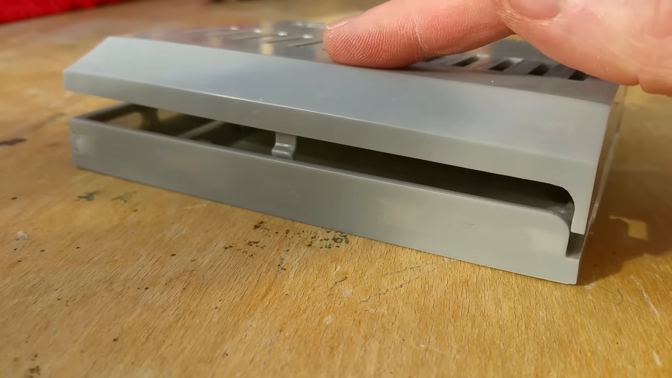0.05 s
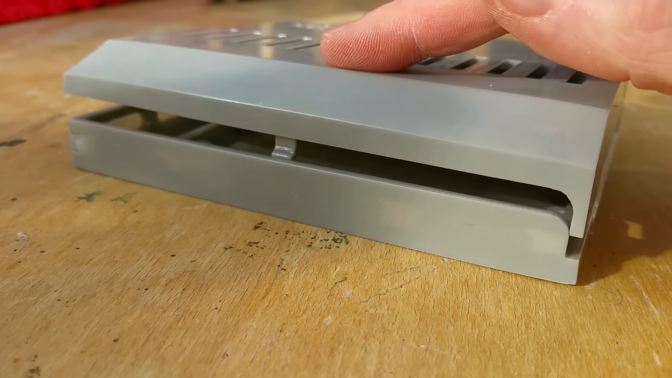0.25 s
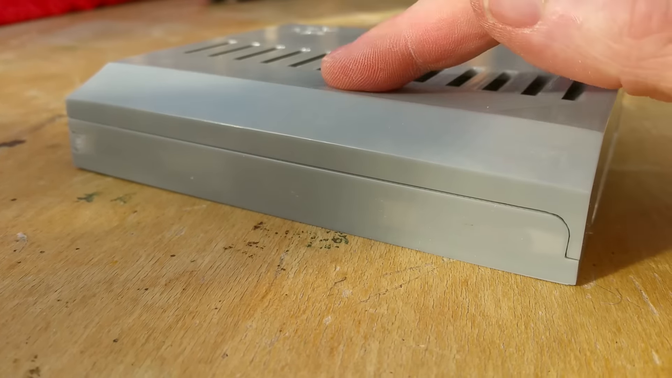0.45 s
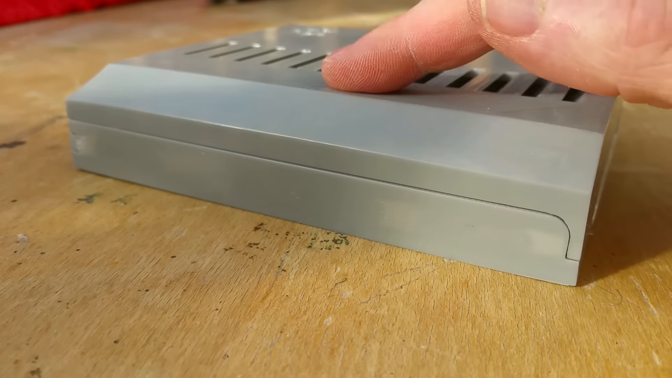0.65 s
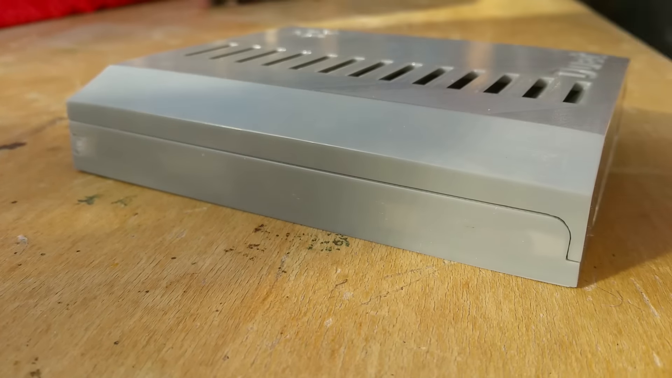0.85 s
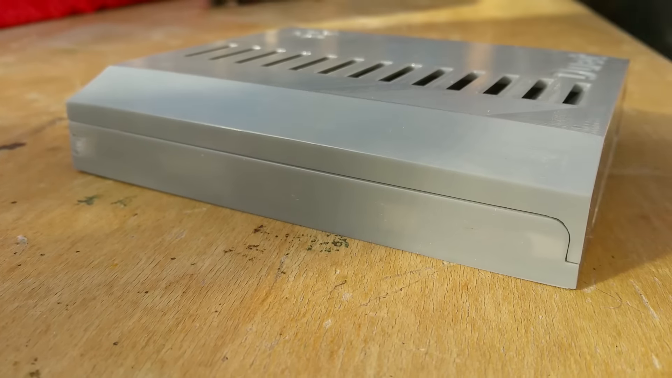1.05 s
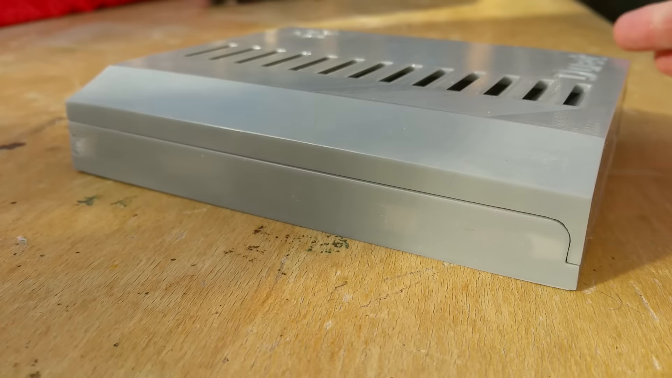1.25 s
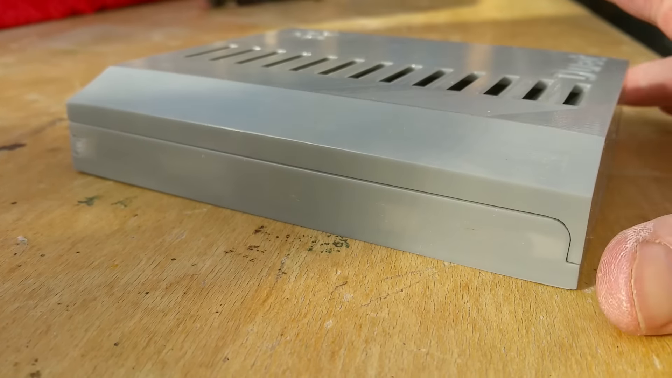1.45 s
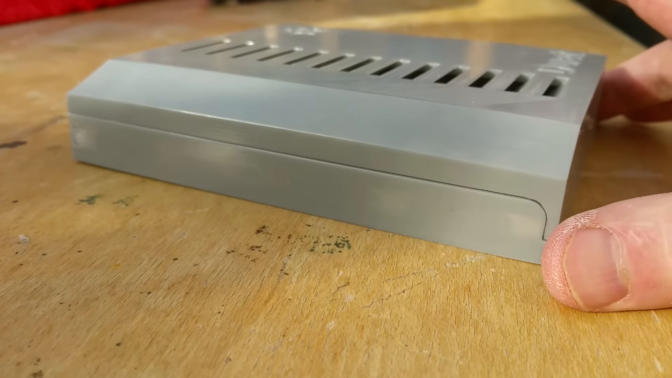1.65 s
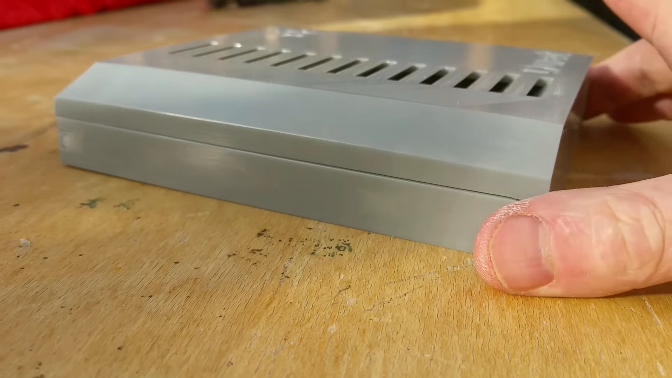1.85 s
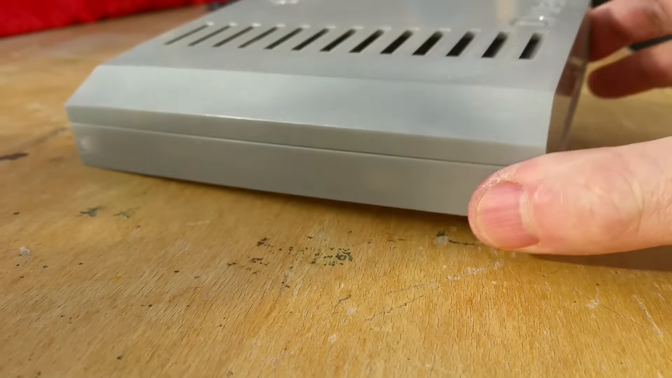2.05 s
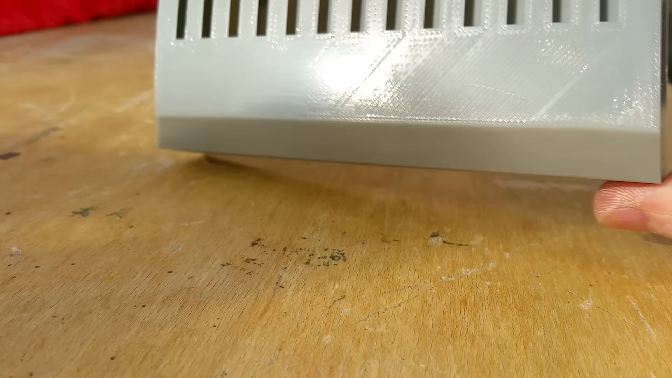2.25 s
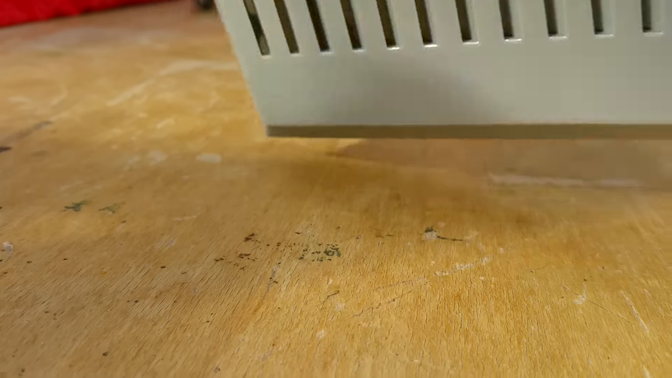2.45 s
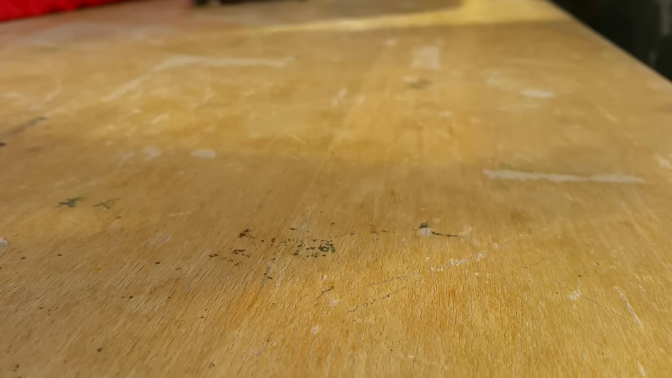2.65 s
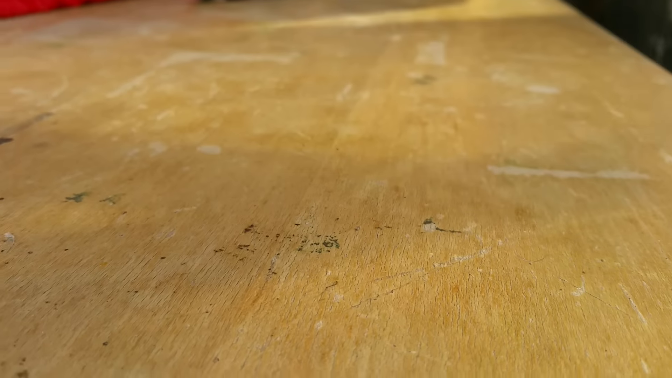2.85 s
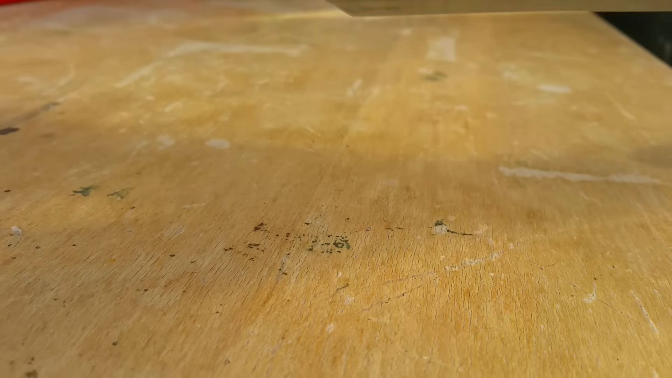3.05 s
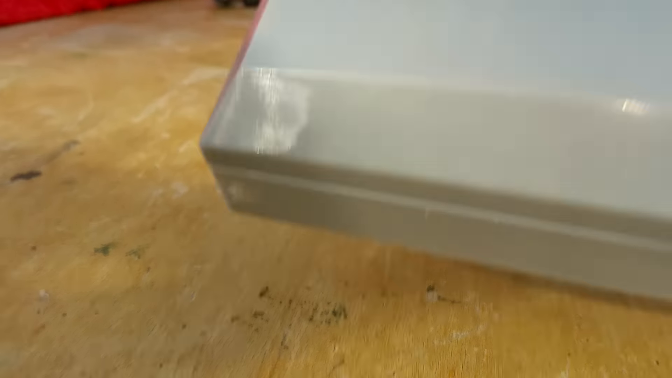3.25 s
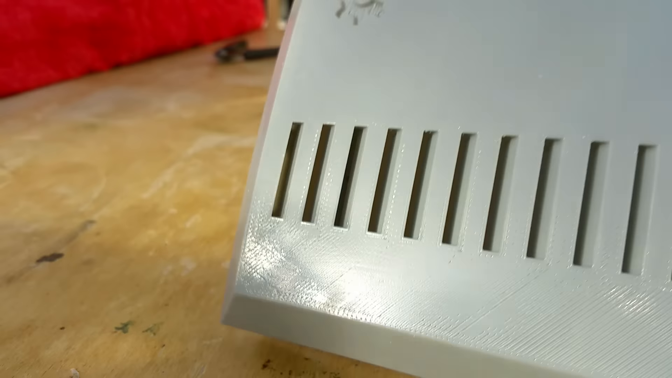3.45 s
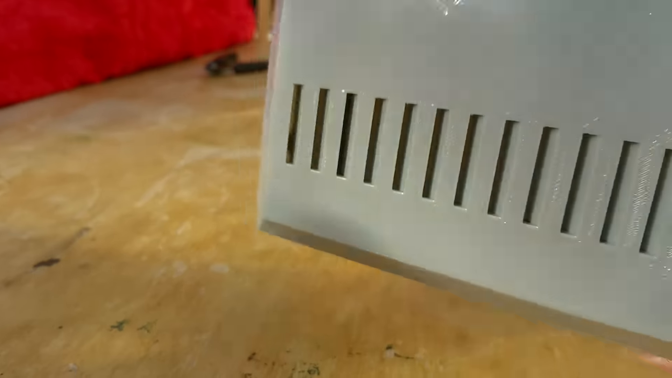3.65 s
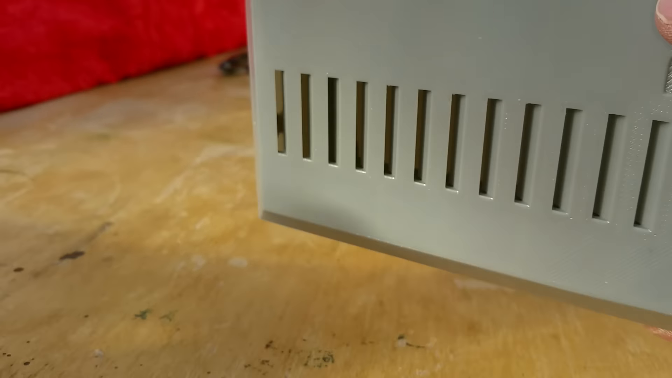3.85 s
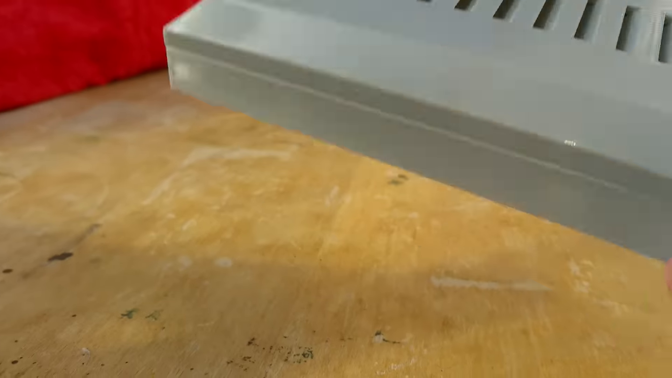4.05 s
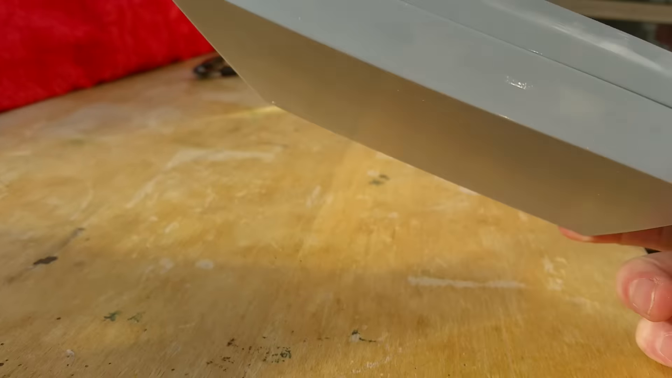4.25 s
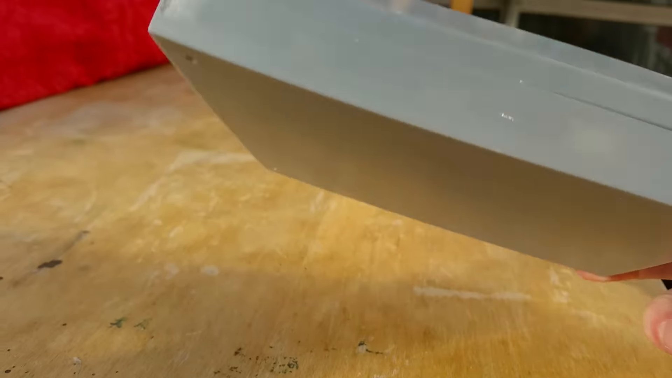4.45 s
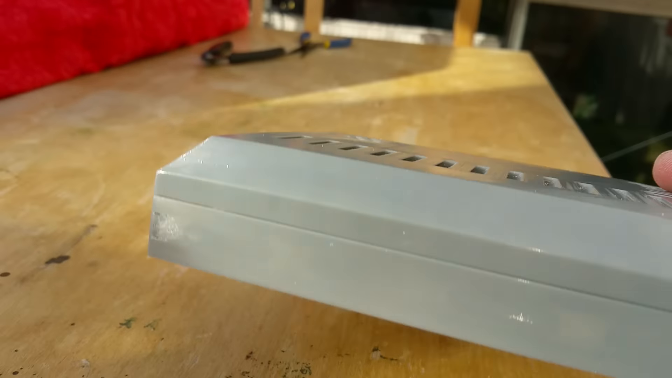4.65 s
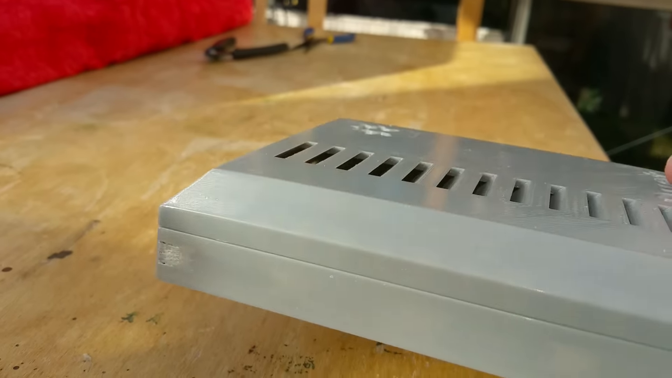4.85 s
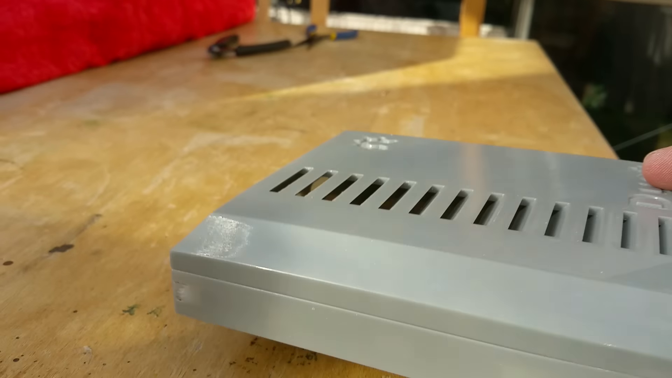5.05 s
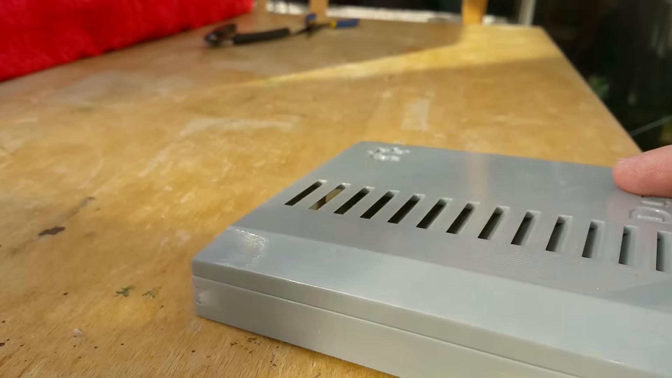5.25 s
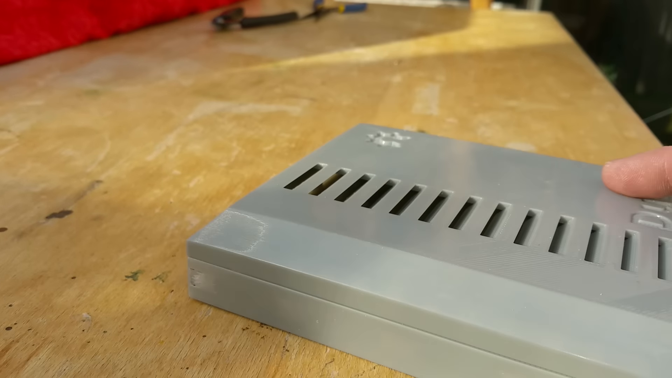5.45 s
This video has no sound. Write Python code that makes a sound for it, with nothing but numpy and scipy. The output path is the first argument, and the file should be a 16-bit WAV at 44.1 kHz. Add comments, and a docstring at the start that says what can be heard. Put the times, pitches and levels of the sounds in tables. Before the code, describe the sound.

In a small, quiet workshop, a plastic lid is pressed home with a loud, close snap that briefly rings the hollow case. The case is dragged a little over wood, rubbing and bumping, then knocks once against the bench. Near the end it clicks sharply and is put down with a short knock. Faint bird chirps and a far engine that swells and fades sit behind it.

```python
"""A small workshop; low, distant rumble throughout. The catch of a hollow plastic case snaps home (0.4 s),
ringing the shell and turning the automatic gain down for a second. Fingers brush the case; small birds
start to whistle outside (1.4 s). The case is dragged in stick-slip over the wooden bench, knocking lightly
(1.6-2.3 s). A far engine drone swells at about 2 s, to fade by 5 s; tiny ticks sound (2.2 s). The case is
lifted, knocked on the bench (3.5 s), clicks sharply once more (5.2 s) and is set down (5.4 s)."""
import sys
import numpy as np
from scipy import signal
from scipy.io import wavfile
from scipy.ndimage import uniform_filter1d

SR = 44100
rng = np.random.default_rng(int(sys.argv[2]) if len(sys.argv) > 2 else 0)


def output_pcm(signal):
    """Save a mono or channel-first signal as 16-bit PCM at the path in sys.argv[1].

    Samples are clipped to [-1, 1] before scaling.
    """
    pcm = np.clip(np.atleast_2d(signal).T, -1, 1) * 32767
    wavfile.write(sys.argv[1], SR, np.round(pcm).astype(np.int16))


N = 242550
TIME_S = np.arange(N) / SR
TAIL_S = TIME_S[:SR // 2]   # time since a blow

FRONT, REAR, EDGE, FOOT, SLIDE = range(5)   # excitation: front catch, rear catch, edge, foot, sliding
EDGES_HZ = 22 * 2 ** np.arange(0, 9.7, 1 / 3)   # third octaves
CENTRES_HZ = np.sqrt(EDGES_HZ[1:] * EDGES_HZ[:-1])
BANDS = [signal.butter(2, pair, "band", fs=SR, output="sos") for pair in zip(EDGES_HZ, EDGES_HZ[1:])]


def from_db(db):
    """Decibels to gain."""
    return 10 ** (np.asarray(db) / 20)


def unit_rms(x):
    """Scale to rms 1."""
    return x / np.sqrt(np.mean(x ** 2) + 1e-20)


def unit_burst(x):
    """Scale to the energy of 10 ms at rms 1."""
    return x / np.sqrt(np.sum(x ** 2, axis=-1, keepdims=True) / (.01 * SR) + 1e-20)


def at_hz(points, hz):
    """Read a table on a log-frequency axis."""
    points_hz, values = np.array(points).T
    return np.interp(np.log(hz), np.log(points_hz), values)


def band_shares(spectrum):
    """Band gains of total power 1; 73 dB/octave roll-off beyond the spectrum's ends."""
    octaves_above = np.maximum(np.log2(CENTRES_HZ / spectrum[-1][0]), 0)
    octaves_below = np.maximum(np.log2(spectrum[0][0] / CENTRES_HZ), 0)
    density_db = at_hz(spectrum, CENTRES_HZ) - 73 * (octaves_above + octaves_below)
    gain = from_db(density_db) * np.sqrt(np.diff(EDGES_HZ))
    return gain / np.linalg.norm(gain)


def pan(balance_db):
    """Left and right gains from L-R level."""
    return from_db(np.array([[1], [-1]]) * balance_db / 2)


def widen(mid, side, hz):
    """Stereo pair from two unrelated signals, alike in the bass."""
    # left-right likeness: (frequency [Hz], correlation [-1..1])
    likeness = [(60, 1), (400, 0.81), (900, -0.096), (1800, 0.078), (4000, -0.1), (9000, -0.18),
                (15000, 0.72)]
    alike = np.clip(at_hz(likeness, hz), -1, 1)
    return (np.sqrt(1 + alike) * mid + np.sqrt(1 - alike) * side * [[1], [-1]]) / np.sqrt(2)


def drift(rate_hz):
    """Smooth random curve, spread about 1."""
    return np.interp(TIME_S * rate_hz, np.arange(N), rng.standard_normal(N))


def swell(at_s, hold_s, rise_db_per_s, fall_db_per_s):
    """Gain that rises to 1 at at_s, holds and falls."""
    before_s = np.clip(at_s - TIME_S, 0, 2)
    after_s = np.clip(TIME_S - at_s - hold_s, 0, 2)
    return from_db(-rise_db_per_s * before_s - fall_db_per_s * after_s)


def add(out, at_s, sound):
    """Mix a sound in at at_s."""
    i = int(at_s * SR)
    out[..., i:i + sound.shape[-1]] += sound[..., :N - i]


def noise(spectrum):
    """Coloured stereo noise, rms 1."""
    white = rng.standard_normal((2, 2, N))
    return unit_rms(sum(gain * widen(*unit_rms(signal.sosfilt(BANDS[k], white[k % 2])), CENTRES_HZ[k])
                        for k, gain in enumerate(band_shares(spectrum)) if gain > 1e-3))


def outdoors(rumble_db=-56, hiss_db=-69, lift_db=3, peak_s=3.07, width_s=0.59):
    """Distant rumble and soft hiss with one broad traffic swell, plus the engine."""
    # noise spectra: (frequency [Hz], relative density [dB])
    rumble_spectrum = [(22, -8), (53, -10), (86, 0), (114, -6.5), (183, -2), (310, -7), (413, -11),
                       (620, -12), (702, -19.5), (808, -16), (1500, -29.5), (1950, -56)]
    hiss_spectrum = [(590, -29.5), (1000, -3.5), (1370, -7.5), (1850, -5), (2200, -10), (3580, -14.5),
                     (5060, -19), (9360, -19), (15900, -20.5)]
    engine = engine_drone()
    traffic_db = lift_db * np.exp(-((TIME_S - peak_s) / width_s) ** 2)
    rumble = from_db(rumble_db + traffic_db) * noise(rumble_spectrum)
    hiss = from_db(hiss_db + traffic_db) * noise(hiss_spectrum)
    return (rumble + engine) * pan(balance_db=3.0) + hiss


def crack(spectrum, t60_s, right_lag_ms, treble_hz=2200, shortening=0.07, hardness=0.74):
    """Hard click, then dense, heavily damped panel modes; higher ones die sooner."""
    # stereo balance: (frequency [Hz], L-R [dB])
    balance = [(100, 1), (600, -0.5), (1400, 3), (3000, -9.5), (8000, -0.5), (14000, -8)]
    out = 0
    for k, (band, hz, gain) in enumerate(zip(BANDS, CENTRES_HZ, band_shares(spectrum))):
        treble_share = hz / (hz + treble_hz)   # click and lag grow towards the treble
        fade = from_db(-60 * TAIL_S / (t60_s * (treble_hz / hz) ** shortening))
        force = rng.standard_normal(len(TAIL_S)) * fade
        force[0] += (-1) ** k * hardness * np.linalg.norm(fade) * treble_share
        left = unit_burst(signal.sosfilt(band, force + 1e-18))
        right = np.interp(TAIL_S - right_lag_ms / 1000 * treble_share, TAIL_S, left, left=0)
        out += gain * np.array([left, right]) * pan(at_hz(balance, hz))
    return out


def case_ring(place, t60_share, detune=0, attack_s=0.0019):
    """Shell modes after one blow, damped and detuned by the grip; phase differs left to right."""
    # shell modes: (frequency [Hz], t60 [s], level for FRONT, REAR, EDGE, FOOT, SLIDE [dB])
    modes = [(179, 0.088, -35.5, -37.5, -25, -52, -44), (237, 0.22, -34.5, -50.5, -37, -23, -43.5),
             (402, 0.15, -31, -22, -28, -18, -27.5), (535, 0.089, -32.5, -45, -19, -6, -54),
             (556, 0.14, -34.5, -19, -33, -0.5, -37), (654, 0.069, -32.5, -34, -16, 1.5, -24),
             (687.7, 0.19, -10.5, -28.5, -31, -21, -21), (780, 0.16, -12.5, -15.5, -31, -35, -40),
             (889, 0.18, -16.5, -12.5, -51, 3, -66), (968, 0.15, -21, -18.5, -23, -22, -20.5),
             (1056, 0.1, -27.5, -17.5, -15.5, -40, -26), (1138.8, 0.06, -26, -45.5, -32, -29, -26),
             (1332, 0.24, -24, -33, -35, -5.5, -49), (1638, 0.11, -18, -15, -28, 0, -47),
             (1680, 0.1, -25, -14.5, -23, -22, -25.5), (1780, 0.12, -30.5, -14.5, -29, -42.5, -35),
             (2146, 0.11, -23.5, -34.5, -41, -33, -39.5), (2307, 0.18, -28, -32, -44.5, -24, -44),
             (2587, 0.15, -25.5, -41, -60, -45, -60), (3200, 0.094, -26.5, -20, -48.5, -38, -71)]
    out = 0
    for hz, t60_s, *levels_db in modes:
        pitch_hz = hz * (1 + detune * rng.standard_normal())
        phase = 2 * np.pi * (pitch_hz * TAIL_S + rng.random())
        envelope = from_db(levels_db[place] - 60 * TAIL_S / (t60_s * t60_share))
        out += envelope * widen(np.sin(phase), np.cos(phase), hz)
    return out * (1 - np.exp(-TAIL_S / attack_s))


def room_tail(spectrum, build_s=0.014):
    """Wall reflections thicken, then die away band by band."""
    # room decay: (frequency [Hz], t60 [s])
    decay = [(100, 0.6), (300, 0.61), (700, 0.23), (2000, 0.22), (4000, 0.25), (12000, 0.2)]
    # room colour: (frequency [Hz], gain [dB])
    colour = [(100, -7), (400, 0), (900, 2), (2000, 0), (4500, 1.5), (9000, -5), (15000, -4)]
    build = 1 - np.exp(-(TAIL_S / build_s) ** 2)
    out = 0
    for band, hz, gain in zip(BANDS, CENTRES_HZ, band_shares(spectrum)):
        envelope = build * from_db(-60 * TAIL_S / at_hz(decay, hz))
        pair = unit_burst(signal.sosfilt(band, rng.standard_normal((2, len(TAIL_S))) * envelope))
        out += gain * from_db(at_hz(colour, hz)) * widen(*pair, hz)
    return out


def blows(thump_hz=243, thump_t60_s=0.016):
    """Snaps and knocks: crack, short low puff of air pushed out of the case, shell ring, room tail."""
    # snaps and knocks: (time [s], place, crack [dB], ring [dB], L-R [dB])
    events = [(0.4333, FRONT, -25, -10, 8.5), (0.4353, FRONT, -12, -4.5, 5.5),
              (0.4562, FRONT, -26.5, -16.5, 6), (1.886, EDGE, -44.5, -31, -1.5),
              (2.1364, EDGE, -46, -24.5, -5), (2.1850, EDGE, -31, -18, 1.5), (2.2428, FOOT, -38, -33, 1),
              (2.2608, FOOT, -43, -37, 1), (3.5234, EDGE, -25.5, -4, 3.5), (3.5271, EDGE, -30, -5, 2),
              (5.1550, REAR, -21.5, -9, 1.5), (5.1563, REAR, -18.5, -7.5, -6.5),
              (5.1706, REAR, -33.5, -10.5, 7), (5.4319, FOOT, -20.5, -16.5, 0.5)]
    # crack spectra: (frequency [Hz], relative density [dB])
    front_crack = [(70, -28.5), (160, -13.5), (290, -7), (480, -18.5), (820, 4.5), (1200, -17), (1600, -5),
                   (2000, -10), (2600, -10), (3400, -8), (4500, -13), (8890, -16.5), (12300, -20),
                   (15900, -25.5)]
    rear_crack = [(120, -14), (341, -16), (620, -7.5), (900, 2.5), (1250, -16), (1650, 2.5), (2000, -1.5),
                  (2500, -11), (3300, -7.5), (6090, -21.5), (8000, -26), (10300, -23.5), (15900, -43.5)]
    edge_crack = [(100, -11), (295, -21.5), (450, 4.5), (698, 10.5), (836, -6), (1080, 6), (1220, -9),
                  (1700, -9.5), (2140, -16.5), (2730, -43), (4200, -37), (7000, -44), (15600, -49)]
    foot_crack = [(120, -17), (312, -16), (520, -1), (750, -4), (930, 10.5), (1150, -12.5), (1450, -6.5),
                  (1800, -12.5), (2200, -7), (2790, -30), (3540, -10.5), (7000, -45), (10000, -35),
                  (15500, -70)]
    # contact per place: (crack t60 [s], room re crack [dB], right treble lead [ms],
    # ring time left by the hand [share], thump re crack [dB])
    contacts = [(0.026, -5, -.09, 0.96, -7), (0.018, -3, 0.35, 0.9, -21), (0.069, -13.5, 0.062, 0.62, -23),
                (0.052, -12.5, 0.177, 0.38, -5)]
    out = np.zeros((2, N))
    thump = np.sin(2 * np.pi * thump_hz * TAIL_S) * from_db(-60 * TAIL_S / thump_t60_s)
    for at_s, place, crack_db, ring_db, balance_db in events:
        spectrum = [front_crack, rear_crack, edge_crack, foot_crack][place]
        t60_s, room_db, lead_ms, t60_share, thump_db = contacts[place]
        hit = from_db(crack_db) * (crack(spectrum, t60_s, -lead_ms) + from_db(thump_db) * thump)
        ring = from_db(ring_db) * case_ring(place, t60_share, detune=0.005)
        room = from_db(crack_db + room_db) * room_tail(spectrum)
        add(out, at_s, (hit + ring) * pan(balance_db) + room)
    return out


def gain_control(x, trigger_db=-11.5, cut_db=10.5, attack_s=0.27, hold_s=1.007, release_db_per_s=44):
    """Left level over the trigger ramps the gain down one step; hold, then release."""
    window_s = .006
    too_loud = uniform_filter1d(x[0] ** 2, int(window_s * SR)) > from_db(trigger_db) ** 2
    since_s = TIME_S - np.maximum.accumulate(np.where(too_loud, TIME_S, -np.inf))
    step_db = np.clip(cut_db - release_db_per_s * (since_s - hold_s), 0, cut_db)
    ramp_db = uniform_filter1d(step_db, int(attack_s * SR))
    delayed_db = np.interp(TIME_S - window_s - attack_s / 2, TIME_S, ramp_db)
    return x * from_db(-delayed_db)


def fingers(fade_db_per_s=243):
    """Soft swishes of skin on plastic."""
    # finger strokes: (time [s], hold [s], level [dB])
    brushes = [(.92, 0.03, -69), (1.225, 0.014, -69), (1.355, 0.014, -72), (1.48, 0.14, -74),
               (3.2, 0.1, -65)]
    # skin friction: (frequency [Hz], relative density [dB])
    skin_spectrum = [(1500, 6.5), (3800, -1.5), (6000, -7.5), (10000, -8), (15500, -23)]
    envelope = sum(from_db(db) * swell(at_s, hold_s, fade_db_per_s, fade_db_per_s)
                   for at_s, hold_s, db in brushes)
    return envelope * noise(skin_spectrum)


def birds(trill_hz=95, direct_db=-6, echo_db=7.0, echo_t60_s=0.32, arch_db=1.4):
    """Runs of whistles, loudest mid-run; each breaks into a trill and is smeared by echoes."""
    # syllables: (first time [s], count, period [s], length [s], start [Hz], middle [Hz], end [Hz],
    # final trill depth [Hz], relative level [dB])
    syllables = [(1.40, 1, 0, 0.2, 7850, 7750, 7900, 60, -81),
                 (1.685, 2, .885, 0.061, 6520, 6650, 6520, 60, -70),
                 (1.856, 2, .88, 0.063, 6500, 6460, 6250, 179, -68),
                 (1.923, 2, .89, 0.044, 6000, 5610, 5560, 160, -66.5),
                 (2.035, 3, .175, 0.08, 4500, 4495, 4510, 81, -67),
                 (2.105, 3, .175, 0.055, 4620, 4810, 5000, 360, -68.5),
                 (2.564, 2, .165, 0.026, 6000, 5640, 4750, 600, -68),
                 (3.098, 1, 0, 0.047, 3790, 4240, 4510, 300, -73.5),
                 (4.076, 5, .146, 0.035, 2477, 2400, 2280, 170, -66),
                 (4.23, 3, .14, 0.024, 3200, 3290, 3220, 218.8, -81),
                 (5.072, 1, 0, 0.039, 4160, 4290, 4300, 400, -74.5)]
    song = np.zeros(N)
    waver_hz = 70 * drift(330)
    for first_s, count, period_s, length_s, *contour_hz, depth_hz, level_db in syllables:
        t = TIME_S[:int(length_s * SR)]
        glide_hz = np.interp(t, [0, length_s / 2, length_s], contour_hz)
        swing_hz = depth_hz * t / length_s * np.sin(2 * np.pi * trill_hz * t)
        envelope = np.sqrt(np.sin(np.pi * t / length_s))
        for k in range(count):
            at_s = first_s + period_s * k
            note_db = level_db - arch_db * (k - (count - 1) / 2) ** 2
            pitch_hz = glide_hz + swing_hz + np.interp(at_s + t, TIME_S, waver_hz)
            add(song, at_s, from_db(note_db) * envelope * np.sin(2 * np.pi * np.cumsum(pitch_hz) / SR))
    response = rng.standard_normal((2, len(TAIL_S))) * from_db(-60 * TAIL_S / echo_t60_s)
    response /= np.linalg.norm(response[0])
    echoes = signal.fftconvolve(song[None], response, axes=1)[:, :N]
    return from_db(direct_db) * song + from_db(echo_db) * echoes


def sliding(slips_per_s=1400, ring_db=-1.5, rub_db=-5.5, grit_db=-2, rough_db=2.5):
    """The case sticks and slips on the wood grain; the slips ring the shell and hiss."""
    # strokes over the bench: (time [s], hold [s], relative body level [dB], relative grit level [dB])
    strokes = [(1.631, 0.054, -41, -50.5), (1.65, 0.018, -34.5, -59), (1.843, 0.02, -45.5, -50),
               (1.899, 0.027, -45, -56.5), (1.982, 0.01, -50.5, -56), (2.033, 0.027, -41.5, -44.5),
               (2.081, 0.075, -46, -59), (2.136, 0.065, -31, -55), (2.257, 0.0066, -34, -61),
               (2.809, 0.018, -55.5, -79), (5.371, 0.044, -51, -59.5)]
    # friction spectra: (frequency [Hz], relative density [dB])
    rub_spectrum = [(300, -14), (450, -8), (683, 13), (850, -2), (1040, 7), (1300, -5), (1550, -5.5),
                    (1900, -15)]
    grit_spectrum = [(1500, 12), (2600, 5), (4000, -1.5), (6000, -12.5), (10000, -20.5), (15500, -35)]
    body_gain, grit_gain = sum(
        from_db(levels_db)[:, None] * swell(at_s, hold_s, rise_db_per_s=951, fall_db_per_s=516)
        for at_s, hold_s, *levels_db in strokes)
    grain = from_db(rough_db * drift(150))
    slips = (rng.random(N) < slips_per_s / SR) * rng.standard_normal(N) * grain
    response = case_ring(SLIDE, t60_share=0.7)
    shell = from_db(ring_db) * unit_rms(signal.fftconvolve(slips[None], response, axes=1)[:, :N])
    rub = from_db(rub_db) * grain * noise(rub_spectrum)
    grit = from_db(grit_db) * grain * noise(grit_spectrum)
    return body_gain * (shell + rub) * pan(balance_db=4.0) + grit_gain * grit


def engine_drone(wander=0.01403, fade_db_per_s=49.5):
    """A far engine swells and fades; its lines waver in pitch and level."""
    # engine swells: (time [s], hold [s], level [dB])
    swells = [(2.35, 0.5, -52), (3.3, 1.26, -60)]
    # engine lines: (frequency [Hz], relative level [dB])
    lines = [(89, 0.5), (156, -5.5), (308, -7.5)]
    envelope = sum(from_db(db) * swell(at_s, hold_s, fade_db_per_s, fade_db_per_s)
                   for at_s, hold_s, db in swells)
    tone = 0
    for hz, db in lines:
        gain = from_db(db + 2.6 * drift(22))
        pitch_hz = hz * (1 + wander * drift(6.3))
        tone += gain * np.sin(2 * np.pi * np.cumsum(pitch_hz) / SR)
    return envelope * tone


def ticks():
    """Tiny, dry, bright ticks."""
    # ticks: (time [s], level [dB], centre [Hz], half-width at -3 dB [octaves])
    events = [(2.224, -60, 5500, 1.5), (2.242, -64, 5500, 0.83), (2.2605, -62.5, 5900, 0.48),
              (5.1383, -60, 3300, 0.22)]
    out = np.zeros((2, N))
    for at_s, level_db, centre_hz, octaves in events:
        spectrum = [(hz, -3 * (np.log2(hz / centre_hz) / octaves) ** 2) for hz in CENTRES_HZ]
        add(out, at_s, from_db(level_db) * crack(spectrum, t60_s=0.012, right_lag_ms=0))
    return out * pan(balance_db=-3)


def scene():
    """Case in front; birds and rumble behind."""
    return blows() + ticks() + sliding() + fingers() + birds() + outdoors()


def record(dry):
    """Automatic gain, clipping at full scale, steep low-pass."""
    stop_hz = 16600
    lowpass = signal.cheby2(16, 60, stop_hz, fs=SR, output="sos")
    return signal.sosfilt(lowpass, np.clip(gain_control(dry), -1, 1))


dry = scene()
out = record(dry)
output_pcm(out)
```